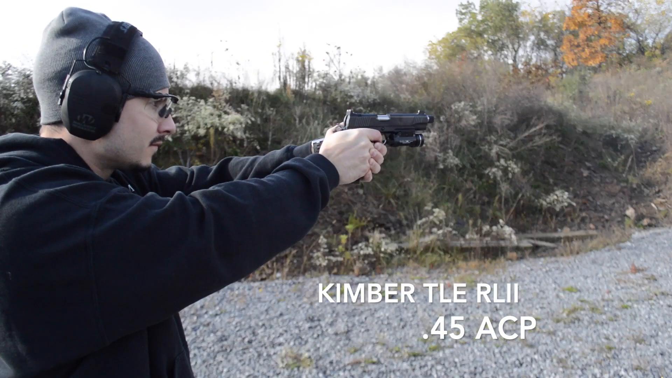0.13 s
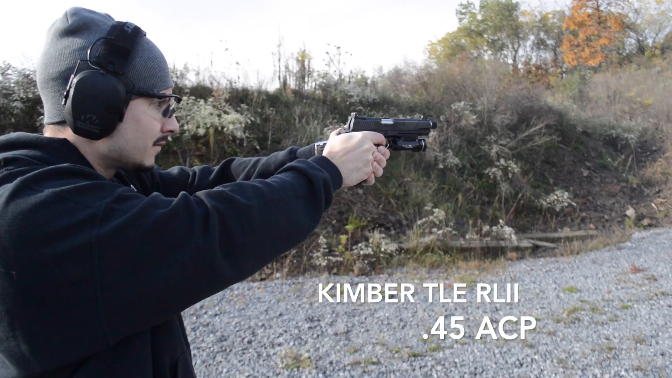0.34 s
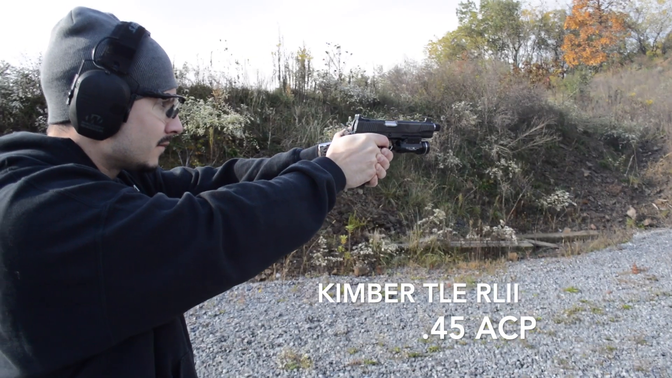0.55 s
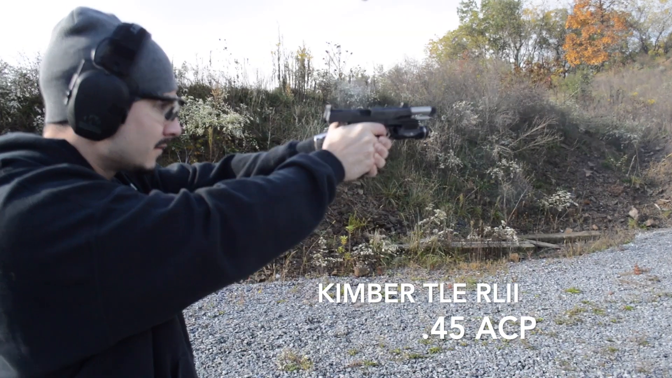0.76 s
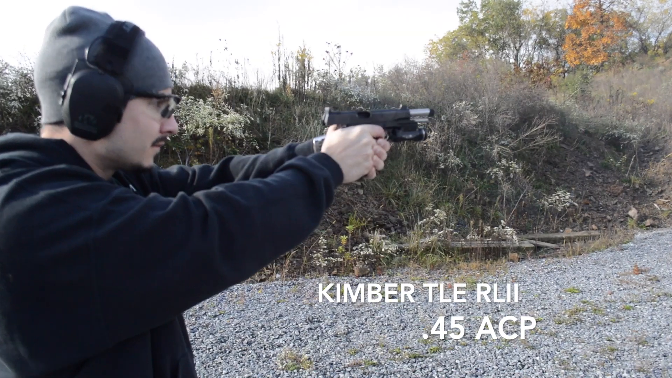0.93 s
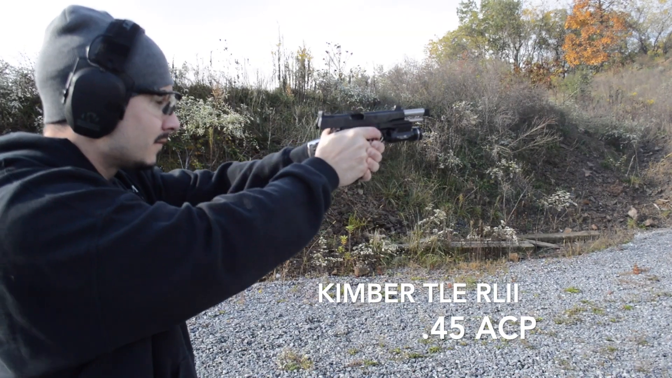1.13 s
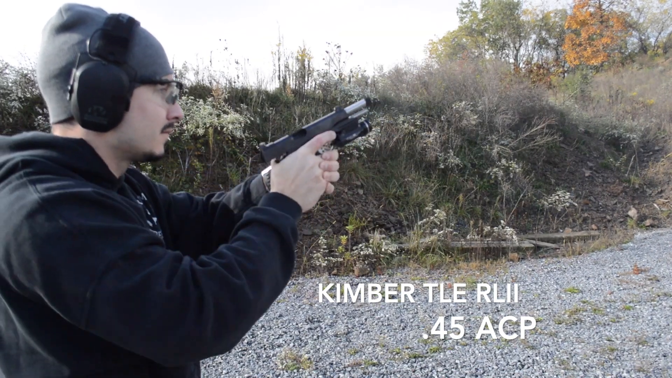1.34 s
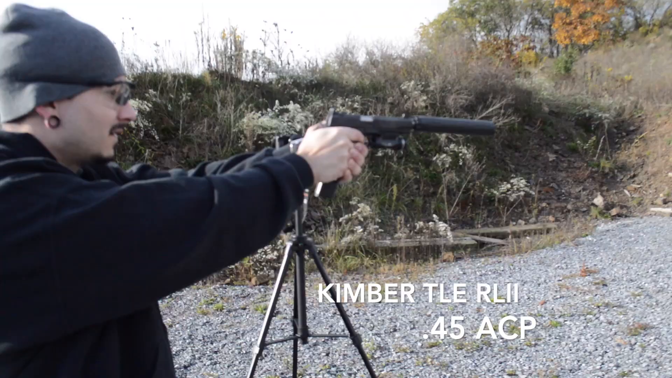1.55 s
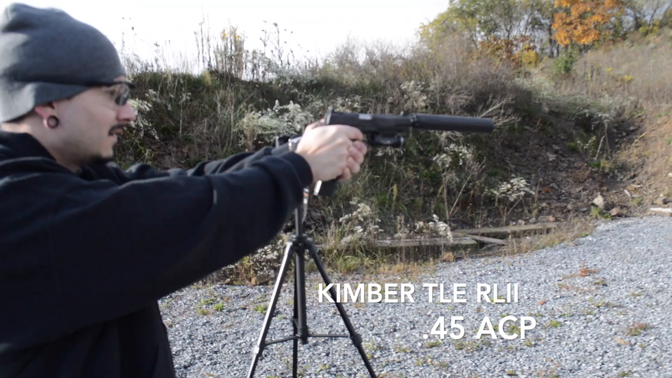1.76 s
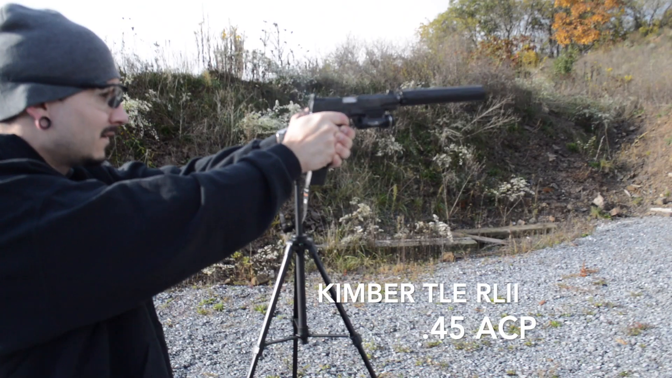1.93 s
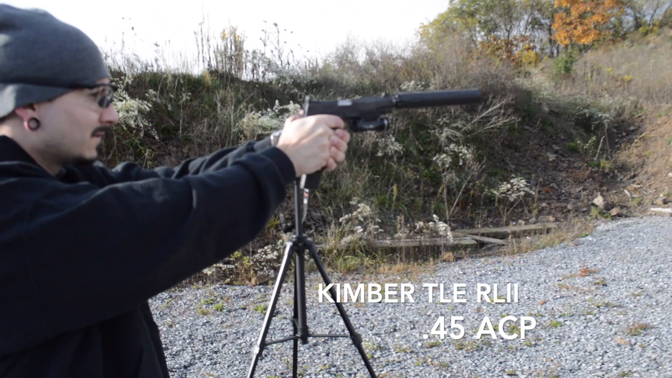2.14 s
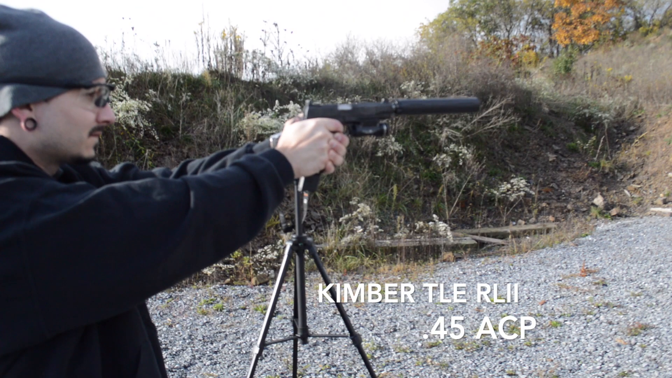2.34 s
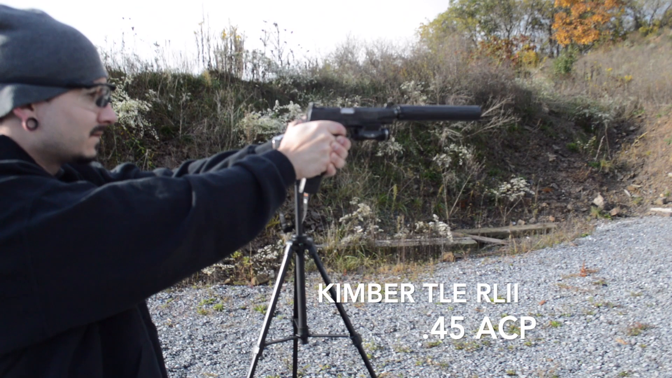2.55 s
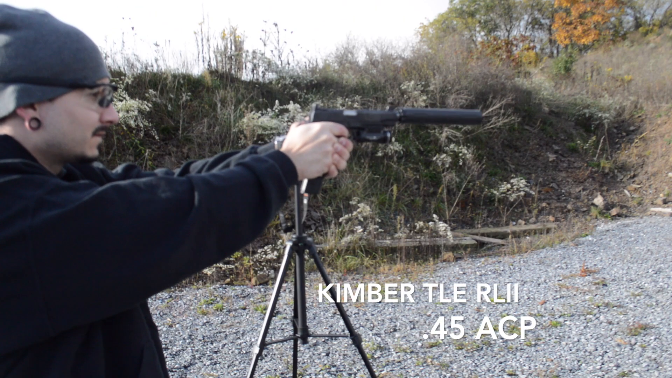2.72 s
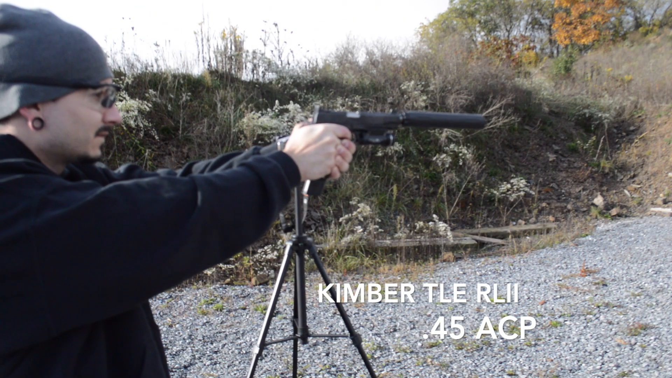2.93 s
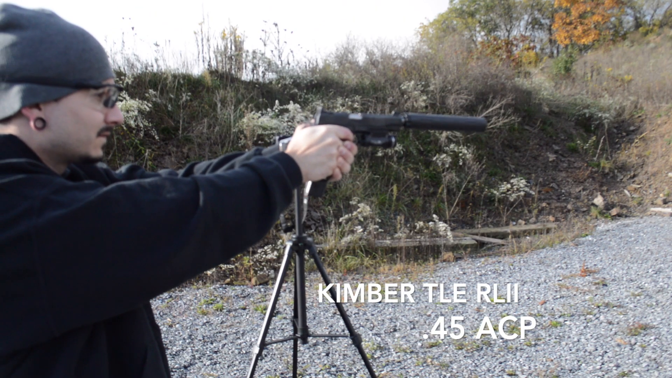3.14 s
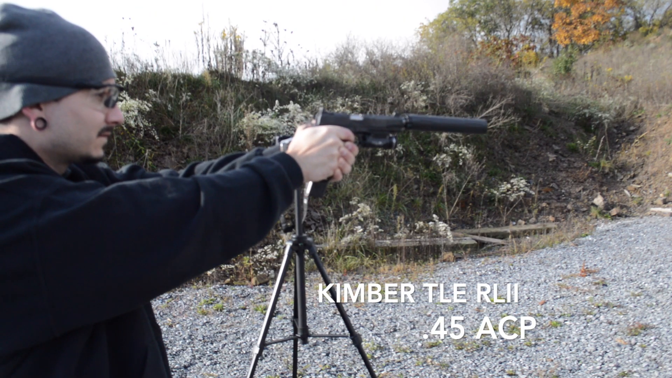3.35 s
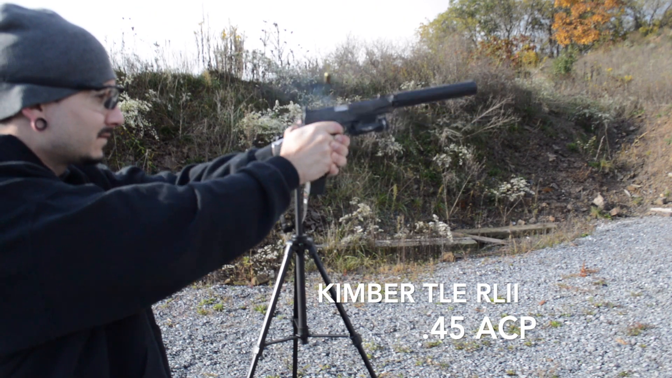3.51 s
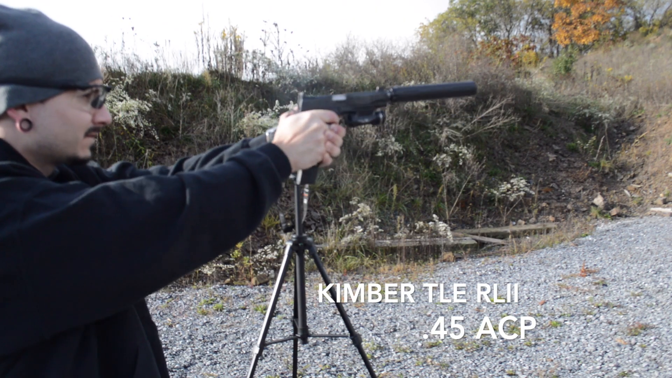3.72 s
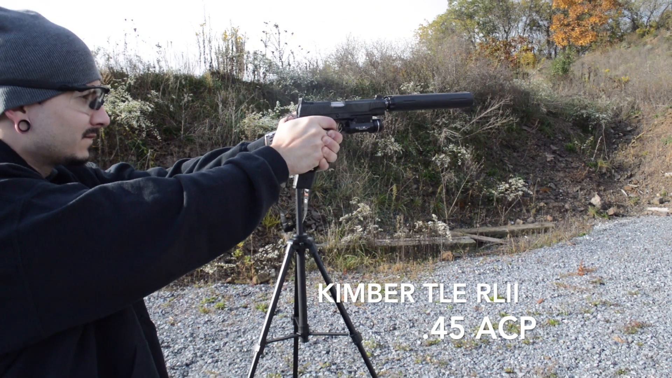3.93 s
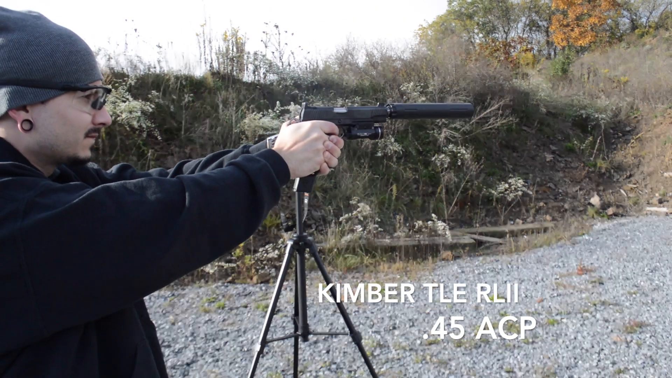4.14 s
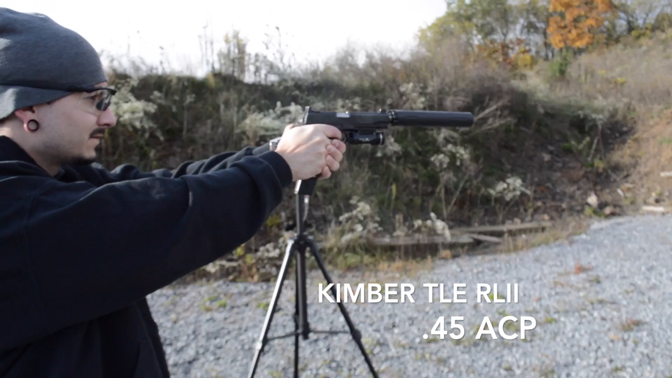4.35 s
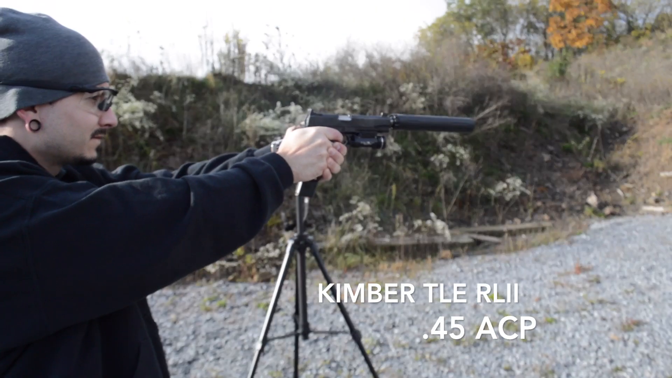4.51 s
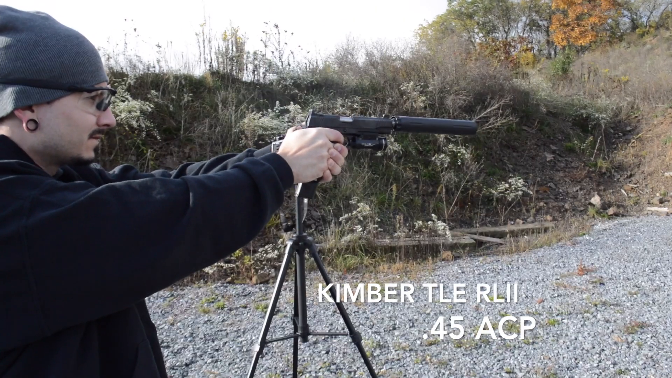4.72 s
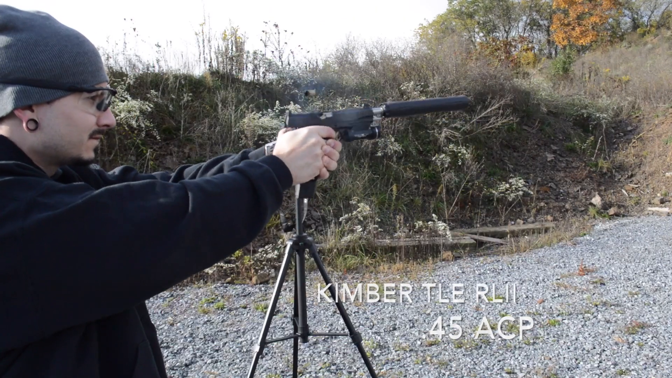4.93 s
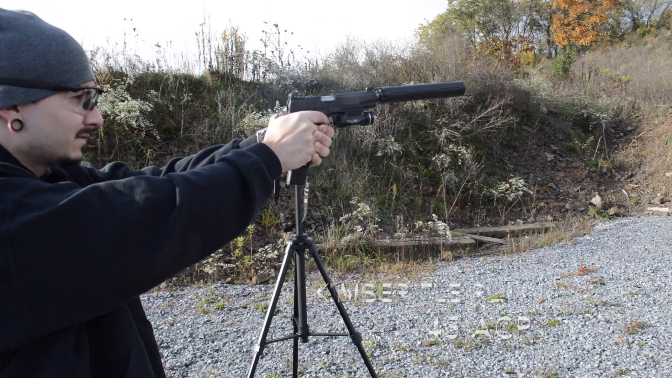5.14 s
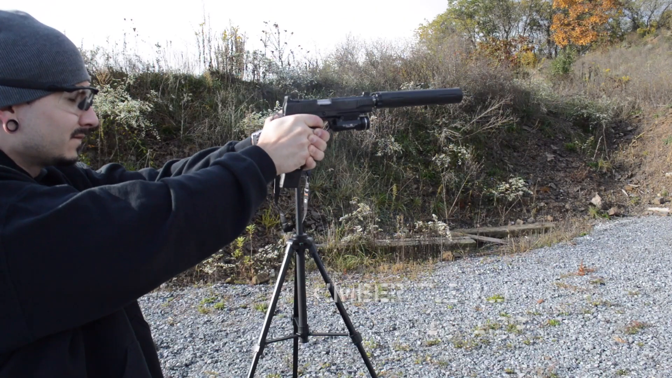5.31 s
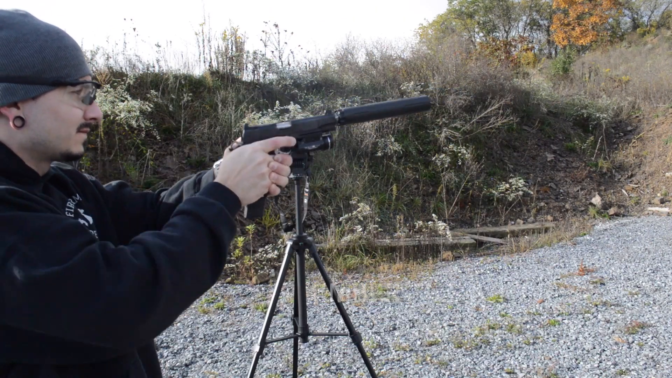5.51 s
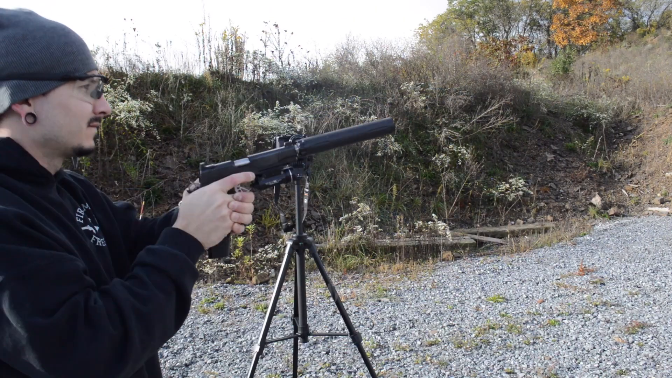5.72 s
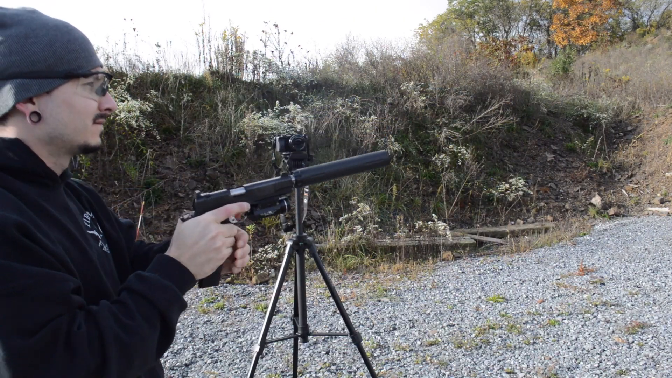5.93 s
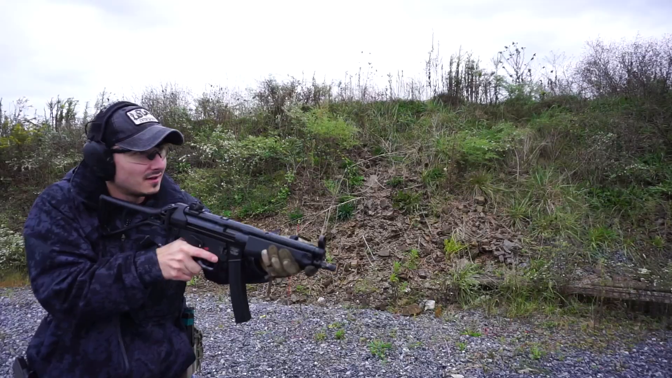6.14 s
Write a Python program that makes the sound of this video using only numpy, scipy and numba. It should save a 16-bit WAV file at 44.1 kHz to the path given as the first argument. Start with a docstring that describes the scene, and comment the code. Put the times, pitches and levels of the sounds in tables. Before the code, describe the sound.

Outdoor gravel range, dry and close, same sound in both channels. At 0 s a pistol shot's echo is already rolling off bank and trees; a brass case pings near 0.07 s, with stony clicks at 0.4 and 0.5. At 0.68 s a bare shot cracks, full and hard, bullet slap 50 ms later, then lumpy echoes for about a second. A low hum stops near 1.6 s. Suppressed shots come at 1.82, 3.48 and 4.93 s: tight bright bursts with slide clack, bullet smack and thinner echo, the background ducking and recovering after each. Cases tick and ring very high around 1.1-1.5, 2.6-2.8, 4.3-4.8, 5.4 and 5.76 s. Wind rumble swells gently near 3.85 and 5.3 s; barely audible bird whistles from 4.1 s. At 6.01 s it cuts abruptly to softer, duller air.

```python
"""Gravel range before an earth bank and a tree line; one close microphone hears a pistol beside it.
The bare muzzle comes first, its earliest shot already echoing at the start, then three suppressed shots.
Hammer, blast, slide and bullet strike follow within 60 ms, as shaped noise and sinking tones; bank and
trees echo as swells of noise; brass rings as sine modes; wind rumbles, birds whistle, a low hum stops early.
A limiter ducks after each shot; at the end the sound cuts to another, quieter place with a duller background."""
import sys
import numpy as np
from scipy import signal
from scipy.fft import rfft, irfft
from scipy.io import wavfile
from scipy.ndimage import uniform_filter1d
from numba import njit

SR = 44100
rng = np.random.default_rng(int(sys.argv[2]) if len(sys.argv) > 2 else 0)


def digitize_waveform(pressure):
    """Quantize a signal to 16-bit integers and store it at the path in sys.argv[1].

    Rows of a 2-D input are taken as channels; values are limited to [-1, 1].
    """
    field = np.atleast_2d(pressure).T
    bounded = np.clip(field, -1, 1)
    quanta = np.round(bounded * 32767).astype(np.int16)
    wavfile.write(sys.argv[1], SR, quanta)


N = 272097
T = np.arange(N) / SR

# shots; a cold suppressor muffles less: start_s [s], blast_db [dB], echo_db [dB], suppression [0-1]
SHOTS = [(-0.278, 11, -5.5, 0), (0.6805, 1.5, -5, 0), (1.8200, 7.5, -10, 0.66), (3.4813, 8.5, -9.5, 1),
         (4.9324, 7.5, -10, 0.88)]
# colour of the echoes from downrange, bare and suppressed: freq_hz [Hz], level_db [dB, relative]
BARE_FAR = [(100, -34), (250, -23.5), (400, 1), (560, 4), (850, 1.5), (1300, 1.5), (1800, -4), (2600, -2),
            (4000, -9), (7000, -11.5), (10000, -19), (15000, -31.5)]
SUPPRESSED_FAR = [(100, -22), (180, -3), (300, -19), (530, -9), (700, -13), (820, -6.5), (1050, -14.5),
                  (1600, 0.5), (2400, -2), (4000, -3), (6500, -6), (10000, -13.5), (15000, -26.5)]
SUPPRESSED_DB_PER_S = -16  # a muffled blast carries less well to the far reflectors


def pistol(hammer_lead_s=0.004, hammer_db=-23, slide_s=0.048):
    """Each shot: the hammer falls, the blast leaves, the slide cycles, the range answers."""
    out = np.zeros(N)
    response = range_response() + trees()
    for start_s, blast_db, echo_db, suppression in SHOTS:
        add(out, start_s - hammer_lead_s, undb(hammer_db) * click(t60=0.065, tilt_db=-1.5))
        add(out, start_s, undb(blast_db) * blast(suppression))
        far_loss_db = suppression * SUPPRESSED_DB_PER_S * seconds(size=len(response))
        echo = colour(response, blend(BARE_FAR, SUPPRESSED_FAR, suppression))
        add(out, start_s, undb(echo_db + far_loss_db) * echo)
        # the slide stands out only beside a muffled blast
        add(out, start_s + slide_s, suppression * slide())
    return out


# blast colour beside the gun, bare and suppressed: freq_hz [Hz], level_db [dB per Hz, relative]
BARE_BLAST = [(35, -18), (70, 3), (200, -0.5), (370, -0.5), (780, -3), (1100, 0.5), (1700, -5), (2400, -1),
              (3100, -9.5), (6200, -4), (9000, -6), (16000, -3.5)]
SUPPRESSED_BLAST = [(35, -18.5), (70, -20), (170, -7.5), (320, 0), (520, -5.5), (740, 0.5), (1100, -15),
                    (2000, -11), (3000, -13), (4300, -3.5), (7800, -3.5), (10000, -6.5), (15000, 0.5)]


def blast(suppression, vent_s=0.0084, vent_t60=0.041, front_db=-1, front_t60=0.057):
    """A hard front, then gas that roars out for some milliseconds and dies away."""
    t = seconds(size=8192)
    gas = noise(len(t), blend(BARE_BLAST, SUPPRESSED_BLAST, suppression))
    venting = fade(np.maximum(t - vent_s, 0), vent_t60)
    front = undb(front_db) * fade(t, front_t60)
    return gas * (venting + front)


def slide(back_db=4, shut_s=0.021, hiss_db=-27, hiss_t60=.22):
    """The slide hits its rear stop with a bright clack, then runs shut with a faint, even hiss."""
    t = seconds(size=16384)
    hiss = noise(len(t), [(20, 0), (20000, 0)])
    out = undb(hiss_db) * hiss * fade(t - shut_s, hiss_t60)
    clack = undb(back_db) * click(t60=0.019, tilt_db=1.5)
    add(out, 0, clack)
    return out


# reflectors, from the gravel underfoot out to the bank and the trees:
# delay_s [s], rise_s [s], hold_s [s], t60_s [s], level_db [dB], tilt_db [dB per octave]
ECHOES = [(0.013, .004, 0.00082, 0.48, -2, 8), (0.065, 0.0089, 0.014, .1, 3.5, -3.5),
          (0.138, 0.045, 0.057, 0.71, -8, 2.5), (.203, .012, 0.13, 0.043, -8, 0.3),
          (0.248, .026, .014, 0.11, -0.5, 0.5), (0.411, 0.0084, 0.041, 0.89, -9.5, -0.56),
          (0.441, 0.0033, .003, .03, -2, -3.5)]


def range_response(grain_db=1.66, lump_db=1.64, patchy_db=2.5):
    """Gravel, bank and trees return swells of small, lumpy reflections; the same for every shot."""
    t, out = seconds(size=65536), 0
    octaves = np.array([-2., 3.])  # around 1600 Hz; the tilt is level beyond these
    for delay_s, rise_s, hold_s, t60_s, level_db, tilt_db in ECHOES:
        rise = np.exp(np.minimum(t - delay_s, 0) / max(rise_s, 1e-4))
        swell = rise * fade(np.maximum(t - delay_s - hold_s, 0), t60_s)
        # paths of nearly equal length interfere, so each echo has its own peaks and dips
        scatter = noise(len(t), [(20, 0), (20000, 0)], patchy_db=patchy_db)
        slope = np.column_stack([1600 * 2 ** octaves, tilt_db * octaves])
        out = out + undb(level_db) * swell * colour(scatter, slope)
    grain = uniform_filter1d(rng.standard_normal(len(t)), size=90)
    lumps = uniform_filter1d(rng.standard_normal(len(t)), size=400)
    return out * undb(grain_db * grain / grain.std() + lump_db * lumps / lumps.std())


# dull colour of a tree's slap: freq_hz [Hz], level_db [dB]
TREE_COLOUR = [(250, -11), (500, 2), (1000, -2), (2000, -10.5), (8000, -31)]
TREES_FROM_S, TREES_EVERY_S, TREES_DB, TREES_T60_S = .472, .021, -1, 0.71


def trees(slap_t60=0.032, spread_db=-0.5):
    """A loose row of dull slaps from single trees, fainter with distance."""
    t, slaps = seconds(size=65536), 0
    for k, (shift, strength) in enumerate(rng.standard_normal(size=(14, 2))):
        behind_s = TREES_EVERY_S * (k + shift / 6)
        slap_db = TREES_DB + spread_db * strength
        slaps = slaps + undb(slap_db) * fade(t - TREES_FROM_S - behind_s, slap_t60)
    distance_fade = fade(np.maximum(t - TREES_FROM_S, 0), TREES_T60_S)
    return colour(slaps * distance_fade * rng.standard_normal(len(t)), TREE_COLOUR)


# bullet strikes: start_s [s], thump_db [dB], pitch_hz [Hz, scale of a sinking pitch], crack_db [dB]
STRIKES = [(0.7345, 24, 749.8, 14), (1.8658, 4, 880, 14.5), (3.5272, -9, 1130, 14),
           (4.9781, 1.5, 1063, 12.5)]
# after each strike, a second knock off the ground, then the thud of the bullet landing in the bank:
# delay_s [s], level_db [dB re the crack], pitch_hz [Hz, scale of a sinking pitch], t60_s [s],
# dirt_db [dB re the body]
LATER_KNOCKS = [(.008, -14, 1510, 0.0063, 4.5), (0.189, -18.5, 2320, 0.025, -7)]
STRIKE_T60_S = 0.0077


def bullets():
    """Each strike slaps; then a second knock off the ground and the thud of the bullet in the bank."""
    out = np.zeros(N)
    for start_s, thump_db, pitch_hz, crack_db in STRIKES:
        add(out, start_s, slap(pitch_hz, thump_db, crack_db, STRIKE_T60_S))
        for delay_s, level_db, knock_hz, t60_s, dirt_db in LATER_KNOCKS:
            body_db = crack_db + level_db
            add(out, start_s + delay_s, slap(knock_hz, body_db, body_db + dirt_db, t60_s))
    return out


def slap(pitch_hz, body_db, dirt_db, t60):
    """A few sinking cycles of pressure and a burst of dirt."""
    t = seconds(size=4096)
    sinking_hz = pitch_hz * (0.758 + 0.61 * fade(t, 0.013))
    body = np.sin(2 * np.pi * np.cumsum(sinking_hz) / SR)
    dirt = noise(len(t), [(150, -6), (500, 0), (4500, -2), (16000, -18)])
    return (undb(body_db) * body + undb(dirt_db) * dirt) * fade(t, t60)


# brass knocks on stone without ringing: start_s [s], level_db [dB],
# tilt_db [dB per octave, held to -1.5...6 by click()]
CLICKS = [(0.373, -4, 2.5), (1.1410, -5.5, -5), (1.287, -10, 0.7), (2.576, -6, 1), (2.7178, -17, 1),
          (2.8132, -16, 3), (3.202, -20.5, -11), (3.8358, -24, 3), (3.876, -17, 5.5), (4.2740, -6, -0.5),
          (4.7536, -12, 1), (4.8057, -22, -3.5), (5.3977, -3, 0.8)]
CLICK_T60_S = 0.005
# a case bounces and rings: start_s [s], click_db [dB], other_end_s [s until its other end lands],
# ring_db [dB], pitch_hz [Hz], second_db [dB, second strong mode], weak_db [dB, weak modes],
# tumble_hz [Hz], free_s [s until stopped]
BOUNCES = [(0.0732, -1.5, .0138, -7.5, 7940, -17, -26, 14.7, .33),
           (0.5165, -4.5, 0.003, -15, 7900, -1.5, -19, 2.3, 0.17),
           (1.5362, -1.5, 0.0024, -8, 7910, -7.5, -3.5, 18, 0.044),
           (2.634, -3, 0.0032, -12.5, 7820, -8, -20, 7.4, 0.19),
           (2.74, -22, 0.011, -21, 7880, -17, -20, 24, 0.22),
           (2.8320, -11, .0102, -12, 7840, -17, -21, 3.3, 0.021),
           (3.2530, -24.5, 0, -41.5, 8300, 23, 0, 3, 0.014),
           (4.2981, -4, .004, -15.5, 7860, -4.5, -15, 57, .28),
           (4.5863, -5.5, 0.0027, -5, 7850, -18.5, -18, 15.3, .14),
           (4.729, -15.5, 0.0044, -24.5, 7850, -14, -19, 24, 0.094),
           (4.8150, -34, 0.022, -25, 7850, -15.5, -20.5, 5, 0.12),
           (5.7581, 2, 0.00098, -24, 7830, 4.5, 14.5, 6.9, 0.058)]
OTHER_END_DB = -3.5  # re the first end


def cases(contact_t60=0.0079, contact_tilt_db=0.92, grit_db=-28, grit_spread_db=14, grit_s=0.17):
    """Spent cases land end after end and ring; each bounce unsettles some grit, which ticks after it."""
    out = np.zeros(N)
    for start_s, level_db, tilt_db in CLICKS:
        add(out, start_s, undb(level_db) * click(CLICK_T60_S, tilt_db))
    for (start_s, click_db, other_end_s, ring_db, pitch_hz,
         second_db, weak_db, tumble_hz, free_s) in BOUNCES:
        add(out, start_s, undb(click_db) * click(contact_t60, contact_tilt_db))
        other_end = undb(click_db + OTHER_END_DB) * click(contact_t60, contact_tilt_db)
        add(out, start_s + other_end_s, other_end)
        add(out, start_s, undb(ring_db) * ring(pitch_hz, second_db, weak_db, tumble_hz, free_s))
        for when, softness in rng.random(size=(5, 2)):
            tick_db = grit_db - grit_spread_db * softness
            add(out, start_s + grit_s * when, undb(tick_db) * click(t60=0.0051, tilt_db=1.5))
    return out


# colour of a hard contact: freq_hz [Hz], level_db [dB, relative]
CLICK_COLOUR = [(100, -41), (500, -3), (1500, -17), (3000, -5), (5000, -2), (7500, 0.5), (11000, -2.5),
                (16000, -1)]


def click(t60, tilt_db, scatter_db=-23, scatter_t60=0.074):
    """A hard, bright contact, with a short scatter off the stones around it."""
    t = seconds(size=4096)
    contact = noise(len(t), CLICK_COLOUR, np.clip(tilt_db, -1.5, 6))
    return contact * (fade(t, t60) + undb(scatter_db) * fade(t, scatter_t60))


# modes of a case: ratio [times the pitch], level_db [dB]
CASE_MODES = [(1, 0), (1.391, -17), (1.527, -2), (1.89, -20), (1.99, -18)]
RING_T60_S, RING_STOP_T60_S, TUMBLE_DEPTH = .32, 0.03, 0.67


def ring(pitch_hz, second_db, weak_db, tumble_hz, free_s, flutter_db=3.0, sway_hz=12):
    """A case rings in the air until it is stopped; tumbling makes it throb, flutter and sway in pitch."""
    t = seconds(size=22050)
    turns = np.cumsum(pitch_hz + sway_hz * wander(t, per_s=69)) / SR
    struck = [0, weak_db, second_db, weak_db, weak_db]  # where the case is hit sets the mix of its modes
    modes = 0
    for (ratio, level_db), struck_db in zip(CASE_MODES, struck):
        mode_db = level_db + struck_db + flutter_db * wander(t, per_s=110)
        modes = modes + undb(mode_db) * np.sin(2 * np.pi * ratio * turns)
    throb = np.abs(1 + TUMBLE_DEPTH * np.exp(2j * np.pi * tumble_hz * t)) / (1 + TUMBLE_DEPTH)
    stop = fade(np.maximum(t - free_s, 0), RING_STOP_T60_S)
    return modes * throb * fade(t, RING_T60_S) * stop


# faint far-off whistles: start_s [s], length_s [s], start_hz [Hz], end_hz [Hz], level_db [dB]
BIRDS = [(4.09, 0.2, 1630, 1420, -56), (4.2, 0.13, 1440, 1550, -51), (4.61, 0.13, 1510, 1580, -51),
         (5.547, 0.048, 3690, 3720, -44), (5.78, 0.27, 1680, 1440, -58.5)]


def birds(waver=0.0087):
    """Soft, wavering whistles that glide, far off in the trees."""
    out = np.zeros(N)
    for start_s, length_s, start_hz, end_hz, level_db in BIRDS:
        t = seconds(size=int(length_s * SR))
        pitch_hz = np.linspace(start_hz, end_hz, len(t)) * (1 + waver * wander(t, per_s=140))
        whistle = np.hanning(len(t)) * np.sin(2 * np.pi * np.cumsum(pitch_hz) / SR)
        add(out, start_s, undb(level_db) * whistle)
    return out


# gusts on the microphone: peak_s [s], rise_s [s], fall_s [s], level_db [dB]
GUSTS = [(3.85, 0.36, 0.32, -41.5), (5.299, 0.45, 0.33, -45)]
# rumble of wind on the microphone: freq_hz [Hz], level_db [dB, relative]
GUST_COLOUR = [(20, -5), (70, -8.5), (170, 3.5), (280, -10.5), (700, -23), (3000, -57)]
BREEZE_DB = -52.5
CUT_S = 6.012  # the sound cuts to another, quieter place with a softer, duller background


def wind():
    """A breeze rumbles on the microphone, swells in gusts, and stops at the cut."""
    strength = undb(BREEZE_DB)
    for peak_s, rise_s, fall_s, level_db in GUSTS:
        width_s = np.where(T < peak_s, rise_s, fall_s)
        strength = strength + undb(level_db) * np.exp(-((T - peak_s) / width_s) ** 2)
    return strength * np.clip((CUT_S - T) / .01, 0, 1) * noise(N, GUST_COLOUR)


# background air, before and after the cut: freq_hz [Hz], level_db [dB per Hz, relative]
AIR = [(20, -15.5), (60, 5.5), (100, -2), (170, -9.5), (270, -17), (500, -18.5), (900, -26.5),
       (2500, -28.5), (8000, -29.5), (16000, -32.5)]
SOFT_AIR = [(18, -33), (30, 3.5), (210, -11.5), (311, -4), (384, -5), (415, -9.5), (600, -9), (1670, -20),
            (2750, -32.5), (16000, -42)]
AIR_DB, SOFT_AIR_DB = -40.5, -44  # rms
# low hum: pitch_hz [Hz], level_db [dB rms]
HUM = [(144, -38.5), (58.7, -53.5)]
HUM_END_S = 1.585


def background(waver=.25):
    """Wind rumble under a smooth hiss, duller after the cut, and a low hum that wavers and stops."""
    after_cut = np.clip((T - CUT_S) / 0.0036, 0, 1)
    range_air = undb(AIR_DB) * noise(N, AIR) * (1 - after_cut)
    soft_air = undb(SOFT_AIR_DB) * noise(N, SOFT_AIR) * after_cut
    drift = waver * np.interp(T, np.linspace(0, T[-1], 40), rng.standard_normal(40))  # radians
    hum = sum(undb(level_db) * np.sqrt(2) * np.sin(2 * np.pi * pitch_hz * T + drift)
              for pitch_hz, level_db in HUM)
    return range_air + soft_air + hum * np.clip((HUM_END_S - T) / 0.07, 0, 1)


def undb(db):
    """Decibels to gain."""
    return 10 ** (np.asarray(db) / 20)


def seconds(size):
    """Time axis of a short sound."""
    return np.arange(size) / SR


def fade(t, t60):
    """Exponential decay that starts at t = 0 and falls 60 dB in t60 seconds."""
    return (t >= 0) * np.exp(-np.log(1000) * np.maximum(t, 0) / max(t60, 1e-4))


def add(track, s, sound):
    """Mix a sound into the track at time s, dropping what falls outside."""
    at = int(round(s * SR)) + np.arange(len(sound))
    inside = (at >= 0) & (at < N)
    track[at[inside]] += sound[inside]


def wander(t, per_s):
    """A random curve through per_s normal draws a second, joined by straight lines."""
    knots = np.arange(0, t[-1] + 1, 1 / per_s)
    return np.interp(t, knots, rng.standard_normal(len(knots)))


def noise(size, spectrum, tilt_db=0, patchy_db=0):
    """Noise of rms 1 with a (Hz, dB) spectrum, tilted per octave, with random peaks and dips if patchy."""
    octave = np.log2(np.maximum(np.fft.rfftfreq(size, 1 / SR), 10))
    hz, db = np.transpose(spectrum)
    patches = np.interp(octave, np.linspace(8, 14, 70), rng.standard_normal(70))
    gain = undb(np.interp(octave, np.log2(hz), db) + tilt_db * octave + patchy_db * patches)
    x = irfft(gain * np.exp(2j * np.pi * rng.random(len(gain))), size)
    return x / x.std()


def colour(x, spectrum):
    """Filter a sound by a (Hz, dB) spectrum."""
    hz, db = np.transpose(spectrum)
    octave = np.log2(np.maximum(np.fft.rfftfreq(len(x), 1 / SR), 10))
    return irfft(rfft(x) * undb(np.interp(octave, np.log2(hz), db)), len(x))


def blend(bare, muffled, suppression):
    """The spectrum part-way, in dB, between the bare muzzle and the suppressor."""
    hz = np.geomspace(30, 16000, 100)
    bare_hz, bare_db = np.transpose(bare)
    muffled_hz, muffled_db = np.transpose(muffled)
    a = np.interp(np.log(hz), np.log(bare_hz), bare_db)
    b = np.interp(np.log(hz), np.log(muffled_hz), muffled_db)
    return np.column_stack([hz, a + np.clip(suppression, 0, 1) * (b - a)])


@njit
def follow(x, attack, release):
    """Peak follower: quick to rise, slow to fall."""
    out, e = np.empty(len(x)), 0.
    for i in range(len(x)):
        e += (x[i] - e) * (attack if x[i] > e else release)
        out[i] = e
    return out


def scene():
    """One microphone feeds both channels."""
    mono = pistol() + bullets() + cases() + birds() + wind() + background()
    return np.tile(mono, (2, 1))


TOP_HZ = 16100  # low-pass edge


def record(dry, attack_s=0.0012, release_s=0.17, limit_db=2.0):
    """The limiter ducks and recovers slowly; fronts that get past it are clipped; a low-pass follows."""
    peak = follow(np.abs(dry[0]), 1 / (attack_s * SR), 1 / (release_s * SR))
    limited = dry / np.maximum(peak / undb(limit_db), 1)
    clipped = limited / (1 + limited ** 8) ** (1 / 8)  # rounded just below 1
    low_pass = signal.ellip(10, .2, 70, TOP_HZ, fs=SR, output="sos")
    return signal.sosfilt(low_pass, clipped)


dry = scene()
out = record(dry)
digitize_waveform(out)
```